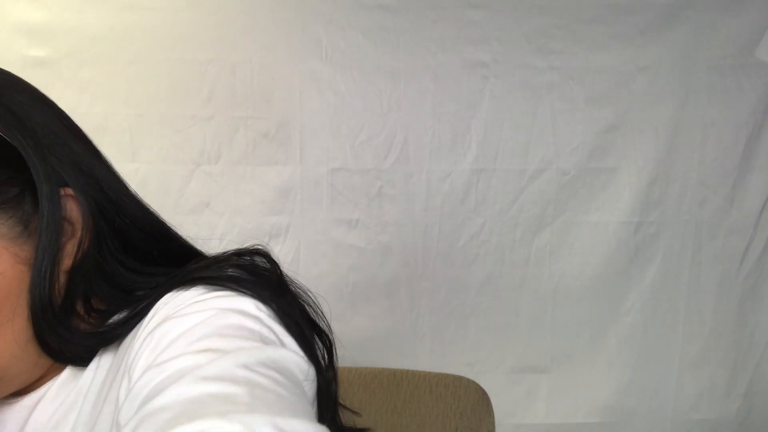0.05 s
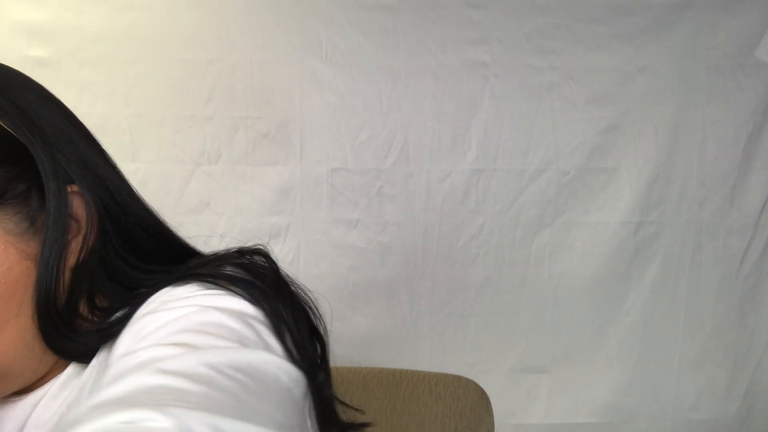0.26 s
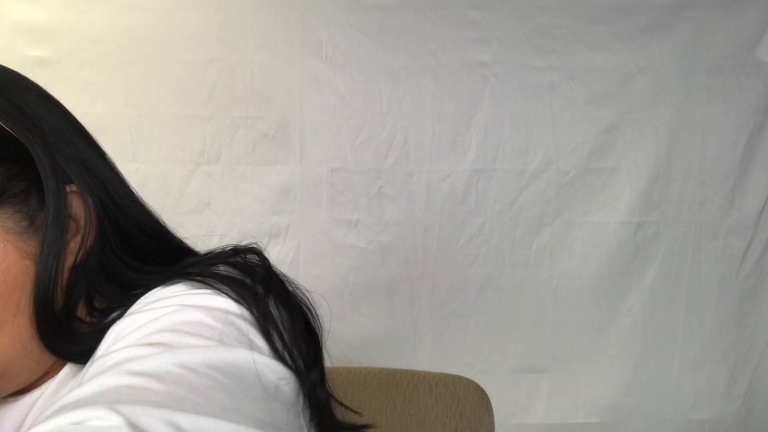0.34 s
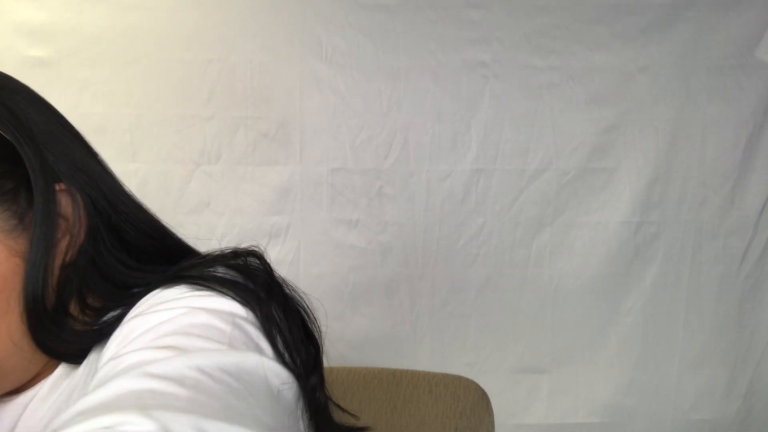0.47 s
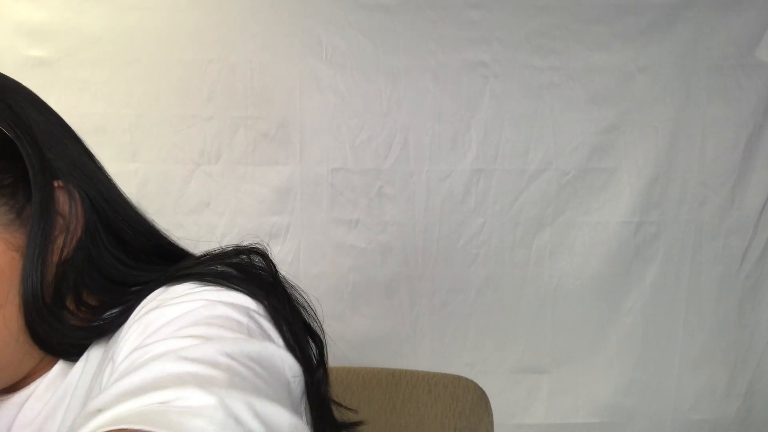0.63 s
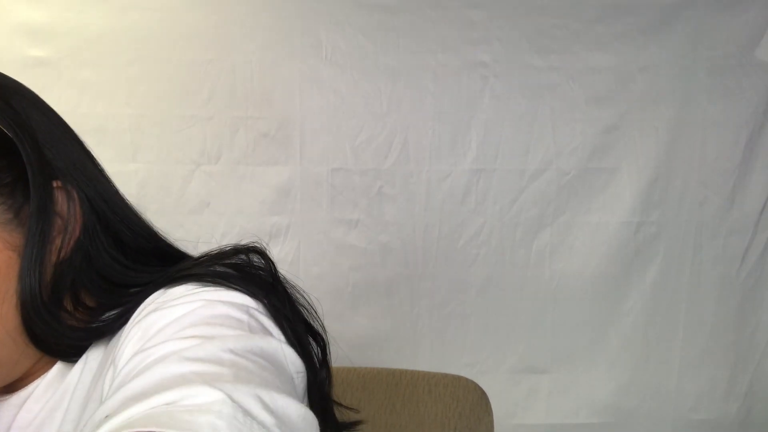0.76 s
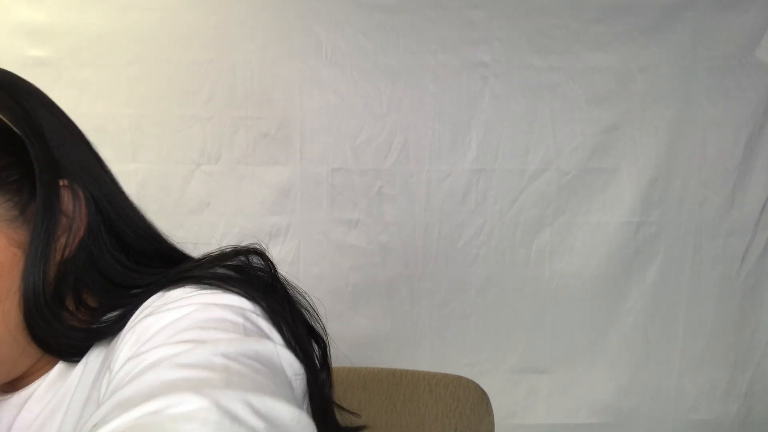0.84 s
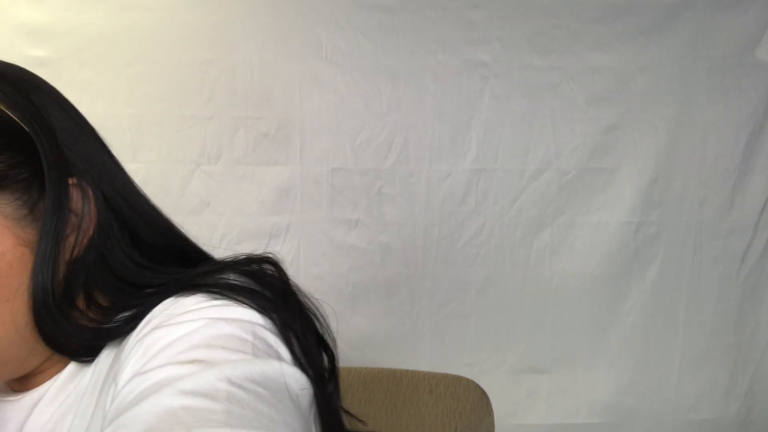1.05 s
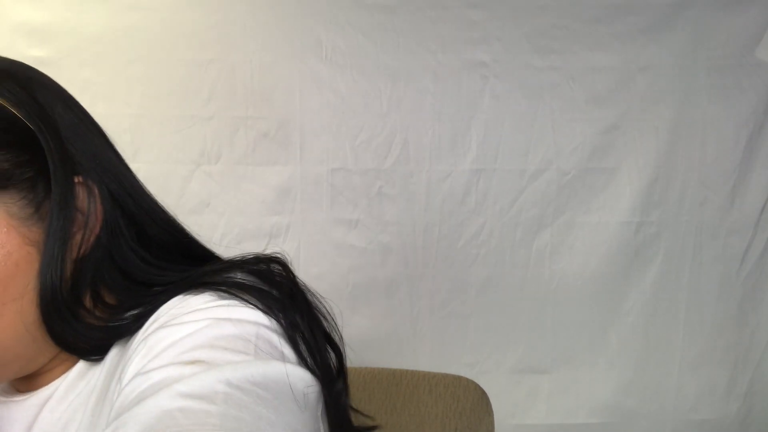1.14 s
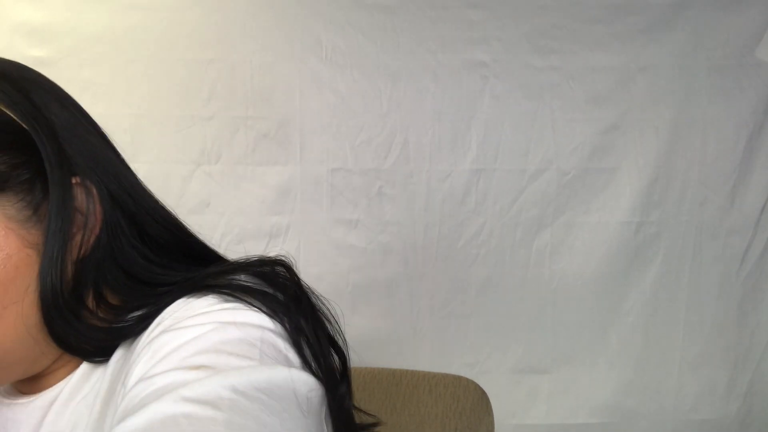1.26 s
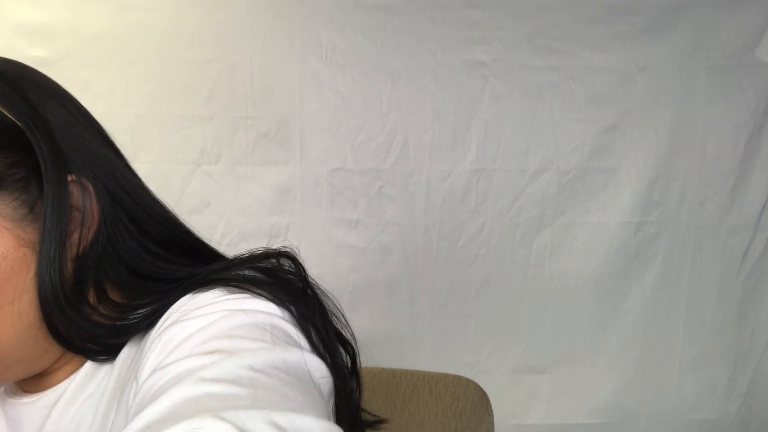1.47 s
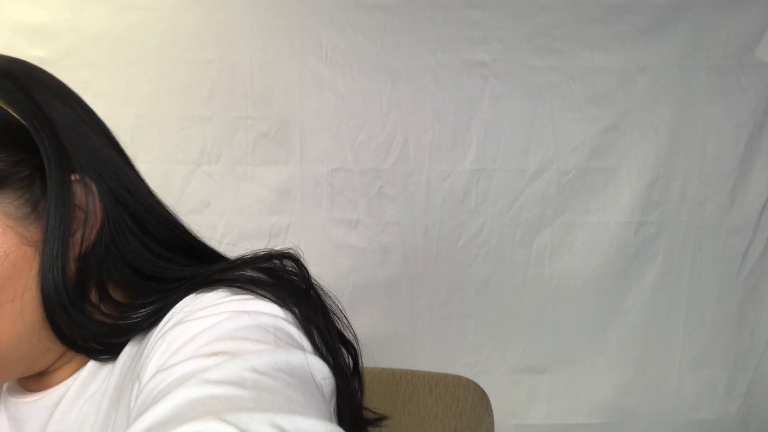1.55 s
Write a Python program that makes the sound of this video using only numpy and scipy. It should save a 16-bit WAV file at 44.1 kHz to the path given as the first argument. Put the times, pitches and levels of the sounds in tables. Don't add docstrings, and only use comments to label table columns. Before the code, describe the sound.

Rummaging through small hard plastic cases: sharp clacks, a sliding crash, then softer hollow knocks indoors

```python
import sys
import numpy as np
from scipy import signal
from scipy.fft import rfft, irfft
from scipy.io import wavfile
from scipy.ndimage import uniform_filter1d

SR = 44100
rng = np.random.default_rng(int(sys.argv[2]) if len(sys.argv) > 2 else 0)


def gain_from_db(level_db):
    decades = np.asarray(level_db, float) / 20
    return 10 ** decades


def wav_out(sig):
    wavfile.write(sys.argv[1], SR, np.round(np.clip(np.atleast_2d(sig).T, -1, 1) * 32767).astype(np.int16))


N = 70560

# (frequency [Hz], density [dB per Hz])
HUM_COLOUR = [(40, -19), (80, 1), (600, -6), (1500, -20), (2500, -18.5), (3600, -25), (6500, -27),
              (15800, -39.5)]
# (time [s], effort [dB])
RUMMAGE_EFFORT = [(0, -39), (.035, -55.5), (.06, -61.5), (.74, -52), (.76, -47.5), (.8, -48.5), (.9, -52),
                  (.94, -59.5), (1.36, -79), (1.4, -51), (1.46, -64)]
# (time [s], effort [dB])
SHUFFLE_EFFORT = [
    (.247, -39),
    (.27, -37),
    (.3, -25.5),
    (.33, -46.5),
    (.4, -47.5),
]
# (time [s], effort [dB])
SLIDE_EFFORT = [
    (.435, -38.5),
    (.448, -39.5),
    (.462, -26),
    (.47, -17.5),
    (.5, -14),
    (.545, -35.5),
    (.565, -21.5),
    (.6, -42),
    (.65, -47),
]
# (frequency [Hz], density [dB per Hz])
SHUFFLE_SPECTRUM = [(900, 7.5), (1500, 4), (1900, 10.5), (3000, 2.5), (3650, -16), (4600, -7.5),
                    (7500, -12.5), (10000, -24.5)]
SLIDE_SPECTRUM = [(300, -22), (1120, 0.5), (1420, -42), (2360, 1), (3100, -13), (3650, -22), (4570, -15),
                  (15500, -37.5)]
# (time [s], level [dB], contact [ms], pitch share [ratio])
DROP_BLOWS = [
    (.002, -32, 0.12, 0.99),
    (.026, -41.5, 0.43, 1.13),
    (.777, -34, 0.55, 1.03),
    (.7915, -17.5, 1.22, 1.026),
    (.836, -18.5, 2.3, 0.96),
    (.873, -30.5, 0.43, 1.1),
]
# (time [s], level [dB], contact [ms], pitch share [ratio])
NUDGE_BLOWS = [
    (.999, -34.5, 0.72, 1.01),
    (1.37, -40.5, 1.36, .99),
    (1.39, -50, 0.85, 1.03),
    (1.525, -56, 1.5, 0.86),
    (.166, -60, 1.1, 1.4),
]
# (time [s], level [dB], contact [ms], pitch share [ratio])
TIP_BLOWS = [
    (.246, -9.5, 0.49, 0.97),
    (.265, -10.5, 0.28, 1),
    (.287, -8, 0.46, 1.05),
    (.294, -9.5, 0.77, 0.94),
    (.3, -7, 0.077, 1),
    (.307, -20.5, 0.97, .86),
    (.413, -18, 1.1, 0.963),
]
# (time [s], level [dB], contact [ms], pitch share [ratio])
THUMP_BLOWS = [
    (.288, -4, 1, 0.97),
    (.3115, -10.5, 3, 0.92),
    (.327, -4, 1.9, 1.025),
    (.3415, -4, 1.6, .99),
    (.5, -17, 2, 1.03),
    (.53, -20, 1.5, 1.05),
    (.56, -16, 0.47, .97),
    (.62, -31, 2.1, 1.01),
    (.71, -28, 0.52, 1.22),
]
# (time [s], level [dB], contact [ms], pitch share [ratio])
CRASH_BLOWS = [(.454, -23, 0.4, 1.1), (.465, -15, 0.51, 0.93), (.469, -8, 0.52, 0.98),
               (.477, -15.5, 0.31, 0.99), (.484, -13, 0.56, 1.23), (.491, -16, 0.49, 0.92),
               (.498, -16, 0.27, 1.07), (.51, -10, 0.042, 1.105), (.516, -12, 0.69, 0.96),
               (.528, -16, 0.51, 1.08), (.532, -11.5, 0.47, .97), (.548, -18, 0.28, 0.98),
               (.5575, -8, 0.42, .98), (.565, -8.5, 0.15, 1.01), (.574, -16, 0.56, .94),
               (.599, -36, 0.69, 1.2), (.609, -28, 0.45, 0.86), (.633, -33, 0.22, 1.02)]
# (time [s], level [dB], contact [ms], pitch share [ratio])
SET_BLOWS = [
    (1.201, -36, 0.44, 0.87),
    (1.205, -14, 0.83, 1.004),
    (1.223, -26.5, 1.53, 0.99),
    (1.253, -24, 1.6, 1.02),
]
# (frequency [Hz], level [dB], t60 [s])
DROP_BODY = [(139.4, -16.5, 0.42), (194.7, -5.5, 0.39), (271, 1.5, 0.26), (346, 5, 0.062), (410, 0, 0.095),
             (472.4, -2.5, 0.19), (584, -2.5, 0.091), (657, -3, 0.065), (1104, 11, 0.01)]
NUDGE_BODY = [(151.8, 7.5, 0.28), (242, -5.5, 0.09), (270, 0, 0.061), (482, -2.5, 0.2), (589, 0.5, 0.23),
              (716, -1, 0.11), (1560, 13.5, 0.01)]
TIP_BODY = [(398.5, 3.5, 0.089), (451, 4, 0.061), (519, -2.5, 0.022), (617, -6.5, 0.13), (802, -3, 0.022),
            (1045, -6, 0.023), (1149, -11, 0.14)]
THUMP_BODY = [(148.5, -9.5, 0.23), (202, -2, 0.27), (268.3, -1, 0.275), (323, 0.5, 0.054)]
CRASH_BODY = [(363, -1.5, 0.026), (454, -0.5, 0.047), (506, -3.5, 0.071), (609, 0, 0.061),
              (726, -3.5, 0.058), (770, -2, 0.041), (860, 3, 0.029), (943, 0, 0.042), (1089, -7, 0.14),
              (1127, -0.5, 0.058), (1236, 3.5, 0.019), (1808, -2.5, 0.03), (2237, -6, 0.03),
              (2530, -40, 0.13)]
SET_BODY = [(157, -10.5, 0.24), (228, 4, 0.079), (295, -9, 0.14), (360.6, -11.5, 0.22), (483, -3, 0.047),
            (617, 8, 0.039), (761, -1.5, 0.078), (890, -6.5, 0.029), (1636, -2.5, 0.021)]
# (time [s], peak [dB], pitch [Hz], t60 [s])
CONTACT_TICKS = [(0.25, -1, 2417, 0.0081), (0.24, -22, 4260, 0.011), (.778, -34, 2000, 0.025),
                 (0.2637, -28, 6340, 0.0071), (0.27, -13.5, 6140, 0.0082), (0.29, -7.5, 4600, 0.0027),
                 (0.29, -12.5, 2600, 0.015), (.304, -33, 8100, 0.0088), (0.34, -29.5, 6900, 0.013),
                 (0.444, -22, 3000, 0.041), (0.5, -6, 4610, 0.017), (0.54, -13, 7140, 0.0059),
                 (0.78, -13.5, 2310, 0.013), (0.84, -19.5, 1570, 0.01), (0.871, -27, 2300, 0.02),
                 (1.094, -37.5, 3500, 0.011), (1.092, -36, 1165, 0.023), (1.124, -36, 1050, 0.024),
                 (1.145, -38.5, 2400, 0.018), (1.226, -40, 1680, 0.017), (1.255, -28, 2700, 0.005),
                 (1.393, -40, 2000, 0.022), (1.402, -34.5, 2560, 0.032), (1.422, -46, 2800, .035),
                 (1.44, -54, 2300, 0.036), (1.405, -46, 5500, .02), (1.41, -45, 6800, .015),
                 (1.419, -57, 2100, .01), (1.593, -46, 2900, .007), (0.27, -21, 7300, 0.0052),
                 (.3, -24.5, 1135, .17), (.345, -28, 615, 0.11), (.41, -29, 530, .06),
                 (.865, -27.5, 170, .2), (.893, -24, 228, 0.12), (.925, -27, 210, .08),
                 (.571, -8, 410, .05), (.6, -21.5, 360, 0.12), (0.63, -4, 800, .009),
                 (.5585, -4, 850, 0.011), (.566, -5, 990, 0.019), (.304, -13, 2200, 0.022),
                 (.836, -19, 266, .13), (1.255, -33.5, 603, 0.22), (1.37, -34, 253.6, 0.19),
                 (1.272, -39, 2400, .005), (1.312, -50, 2600, .005), (1.494, -47, 3200, 0.0049),
                 (1.545, -43, 3200, 0.009)]
# (time [s], level [dB], t60 [s])
TIP_CRACKS = [
    (0.245, -34, 0.004),
    (.2645, -51, 0.0028),
    (.273, -38, 0.0026),
    (0.2877, -28, 0.0023),
    (.294, -36, 0.0032),
    (0.308, -34, .004),
    (.354, -38.5, 0.0053),
]
# (time [s], level [dB], t60 [s])
CRASH_CRACKS = [
    (.458, -36, 0.0056),
    (0.467, -21, 0.0096),
    (0.472, -23, 0.0027),
    (0.4885, -13.5, 0.006),
    (0.4925, -13, 0.008),
    (.476, -36, .006),
    (.5555, -31, 0.0073),
]
# (frequency [Hz], density [dB per Hz])
TIP_CRACK_SPECTRUM = [(3300, -37), (4200, 5), (6500, 6), (8000, -5), (10000, -4.5), (12500, -4),
                      (15800, -20)]
CRASH_CRACK_SPECTRUM = [(3300, -37), (3900, 6), (4700, 4), (7500, 3.5), (10000, -1), (12500, 1.5),
                        (15800, -13)]

HUM_DB, HUM_WANDER_DB = -45, 1.0
GRAIN_SPREAD_DB = 2.5
TICK_SPREAD, TICK_RISE_SHARE, TICK_RISE_MAX_S = 0.1243, .075, .004
CRACK_MAX_T60_S, CRACK_DB = .009, 4.5
RADIATES_HZ = 121
WALL_GAP_S, WALL_HZ, WALL_BASS_DB, WALL_TREBLE_DB = .01662, 1800, -17, -4.7
ROOM_T60_S, ROOM_TREBLE_T60_S, ROOM_ONSET_S = .19, .2, .0062
ROOM_DB, ROOM_TREBLE_DB, ROOM_TOP_HZ = -6, -5, 5500
CAMERA_TOP_HZ = 15900


def level(x, db):
    return x * gain_from_db(db) / np.sqrt(np.mean(x ** 2))


def colour(x, table):
    hz, db = np.array(table, float).T
    f = np.maximum(np.arange(N // 2 + 1) * SR / N, 1)
    gain_db = np.interp(np.log(f), np.log(hz), db)
    return irfft(rfft(x) * gain_from_db(gain_db), N)


def add(out, s, sound):
    i = max(int(s * SR), 0)
    out[i:i + len(sound)] += sound[:N - i]


def hum():
    steps = np.repeat(rng.standard_normal(N // 2000 + 1), 2000)
    wander = uniform_filter1d(steps, 2000)[:N]
    tone = level(colour(rng.standard_normal(N), HUM_COLOUR), HUM_DB)
    return tone * gain_from_db(HUM_WANDER_DB * wander)


def slips(effort, rate_hz):
    s, db = np.array(effort).T
    u = rng.random((3, N))
    slipping = u[0] < rate_hz / SR
    size = gain_from_db(-GRAIN_SPREAD_DB * np.log(1 - u[2]))
    clicks = slipping * np.sign(u[1] - .5) * size
    effort_db = np.interp(np.arange(N) / SR, s, db, left=-120, right=-120)
    return level(clicks, 0) * gain_from_db(effort_db)


def ring(x, hz, t60):
    pole = np.exp(2j * np.pi * hz / SR - np.log(1000) / (max(t60, 1e-3) * SR))
    return signal.lfilter([1], [1, -pole], x).imag


def body(blows, modes, rub=None):
    def rings(push, share):
        out = 0
        for k, (hz, db, t60) in enumerate(modes):
            out = out + (-1) ** k * gain_from_db(db) * ring(push, hz * share, t60)
        return out

    out = np.zeros(N) if rub is None else rings(rub, 0.98)
    for s, db, contact_ms, share in blows:
        phase = np.clip(np.arange(SR // 3) / (contact_ms * SR / 1000), 0, 1)
        bump = np.sin(np.pi * phase)
        add(out, s, rings(gain_from_db(db) * bump / bump.sum(), share))
    return out


def ticks():
    out, t = np.zeros(N), np.arange(SR // 4) / SR
    for (s, db, hz, t60), turns in zip(CONTACT_TICKS, rng.random((len(CONTACT_TICKS), 2))):
        side = 0
        for k, turn in zip((-1, 1), turns):
            side = side + np.sin(2 * np.pi * (hz * (1 + k * TICK_SPREAD) * t + turn))
        rise_s = min(TICK_RISE_SHARE * t60, TICK_RISE_MAX_S)
        envelope = gain_from_db(db - 60 * t / t60) * (1 - np.exp(-(t / rise_s) ** 2))
        add(out, s, envelope * (np.sin(2 * np.pi * hz * t) + 0.33 * side))
    return out


def cracks(events, spectrum):
    out, t = np.zeros(N), np.arange(2048) / SR
    for (s, db, t60), hiss in zip(events, rng.standard_normal((len(events), 2048))):
        add(out, s, gain_from_db(db - 60 * t / min(t60, CRACK_MAX_T60_S)) * hiss)
    return gain_from_db(CRACK_DB) * colour(out, spectrum)


def room(x):
    out, echo, gap = x.copy(), x, int(WALL_GAP_S * SR)
    for _ in range(10):
        late = np.pad(echo, (gap, 0))[:N]
        bass = signal.lfilter(*signal.butter(1, WALL_HZ, fs=SR), late)
        echo = gain_from_db(WALL_BASS_DB) * bass + gain_from_db(WALL_TREBLE_DB) * (late - bass)
        out = out + echo
    t = np.arange(SR // 2) / SR
    high_pass = signal.butter(2, 380, "high", fs=SR, output="sos")
    noise = signal.sosfilt(high_pass, rng.standard_normal(len(t)))
    low = signal.sosfilt(signal.butter(2, 1500, fs=SR, output="sos"), noise)
    tail = low * gain_from_db(-60 * t / ROOM_T60_S)
    tail = tail + (noise - low) * gain_from_db(ROOM_TREBLE_DB - 60 * t / ROOM_TREBLE_T60_S)
    tail = tail * np.clip(t / ROOM_ONSET_S, 0, 1)
    tail = tail / np.sqrt(np.sum(tail ** 2))
    dull = signal.lfilter(*signal.butter(2, ROOM_TOP_HZ, fs=SR), x)
    return out + gain_from_db(ROOM_DB) * signal.fftconvolve(dull, tail)[:N]


def scene():
    rummage = slips(RUMMAGE_EFFORT, 1500)
    shuffle = slips(SHUFFLE_EFFORT, 2000)
    slide = slips(SLIDE_EFFORT, 3000)
    dry = gain_from_db(2.0) * colour(shuffle + rummage, SHUFFLE_SPECTRUM)
    dry = dry + gain_from_db(11.5) * colour(slide, SLIDE_SPECTRUM)
    dry = dry + gain_from_db(-2) * body(DROP_BLOWS, DROP_BODY, gain_from_db(-22.5) * rummage)
    dry = dry + gain_from_db(-2) * body(NUDGE_BLOWS, NUDGE_BODY)
    dry = dry + gain_from_db(-10.0) * body(TIP_BLOWS, TIP_BODY, gain_from_db(-14.5) * shuffle)
    dry = dry + gain_from_db(-14) * body(THUMP_BLOWS, THUMP_BODY)
    dry = dry + gain_from_db(-3.5) * body(CRASH_BLOWS, CRASH_BODY, gain_from_db(-22) * slide)
    dry = dry + gain_from_db(-2) * body(SET_BLOWS, SET_BODY)
    dry = dry + ticks()
    dry = dry + cracks(TIP_CRACKS, TIP_CRACK_SPECTRUM) + cracks(CRASH_CRACKS, CRASH_CRACK_SPECTRUM)
    dry = signal.sosfilt(signal.butter(2, RADIATES_HZ, "high", fs=SR, output="sos"), dry)
    return (room(dry) + hum())[None]


def band_limit(x):
    return signal.sosfilt(signal.butter(12, 15990, fs=SR, output="sos"), x)


def record(dry):
    top_cut = signal.ellip(10, .2, 70, CAMERA_TOP_HZ, fs=SR, output="sos")
    mix = signal.sosfilt(top_cut, np.tanh(dry))
    return band_limit(mix)


dry = scene()
out = record(dry)
wav_out(out)
```